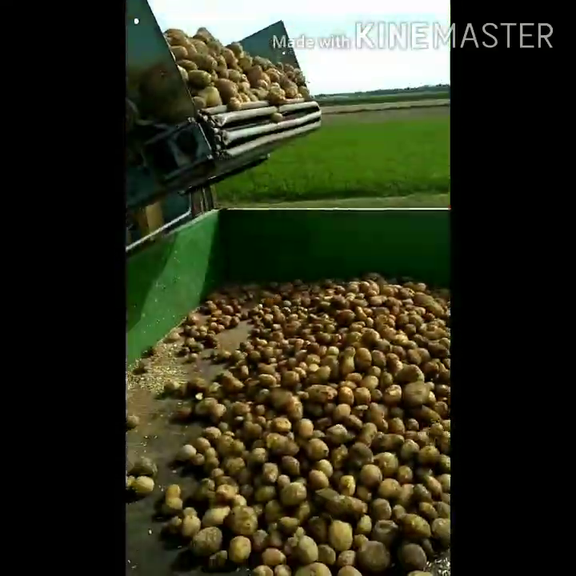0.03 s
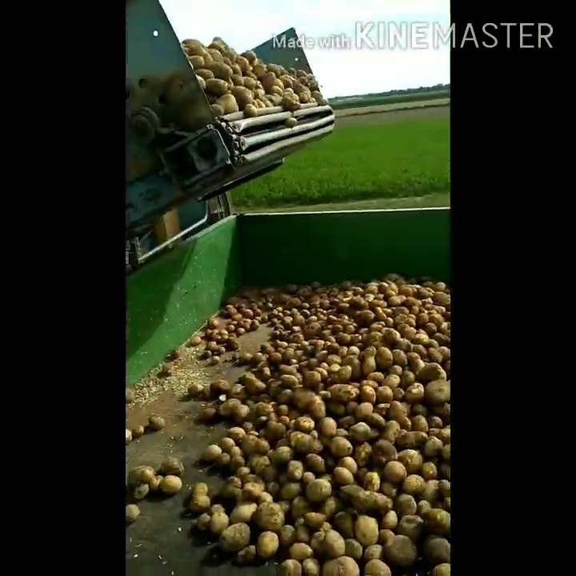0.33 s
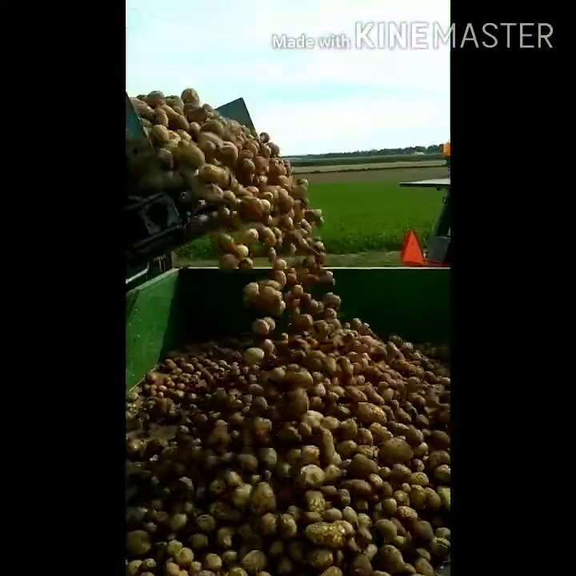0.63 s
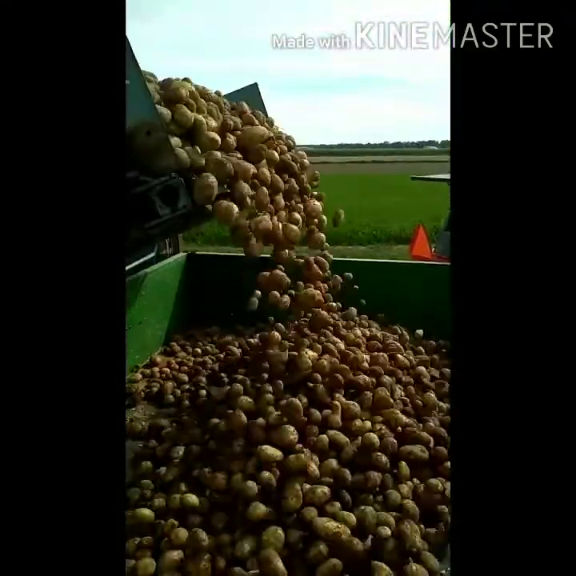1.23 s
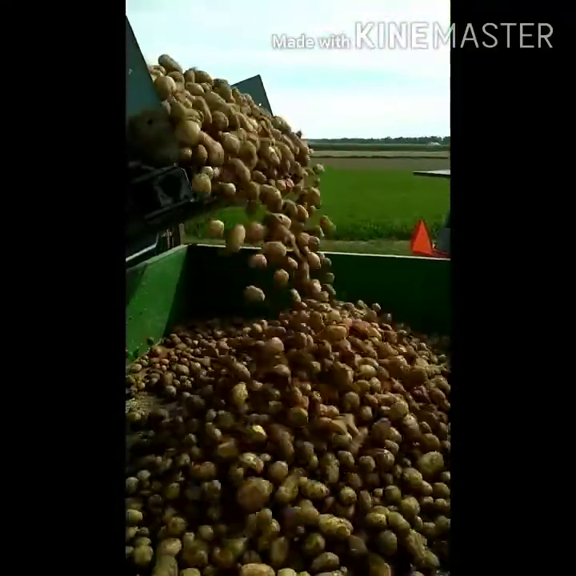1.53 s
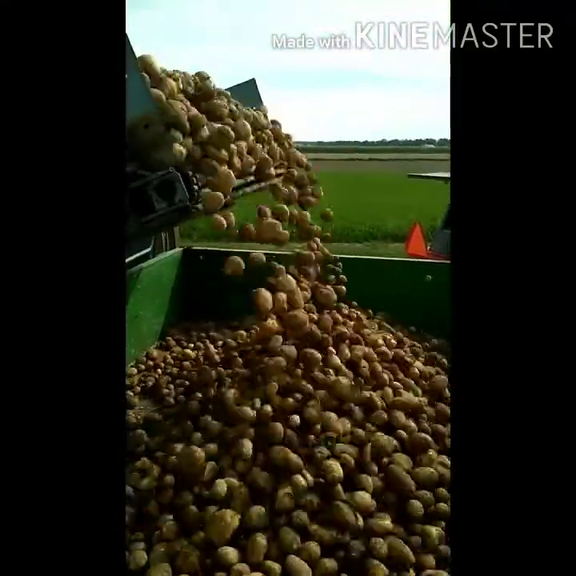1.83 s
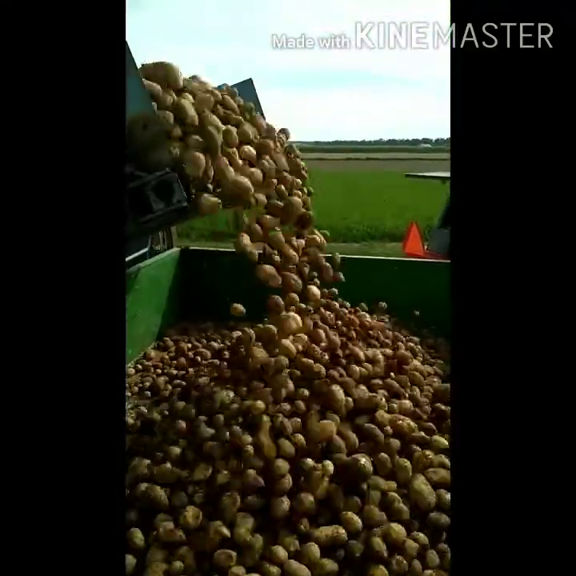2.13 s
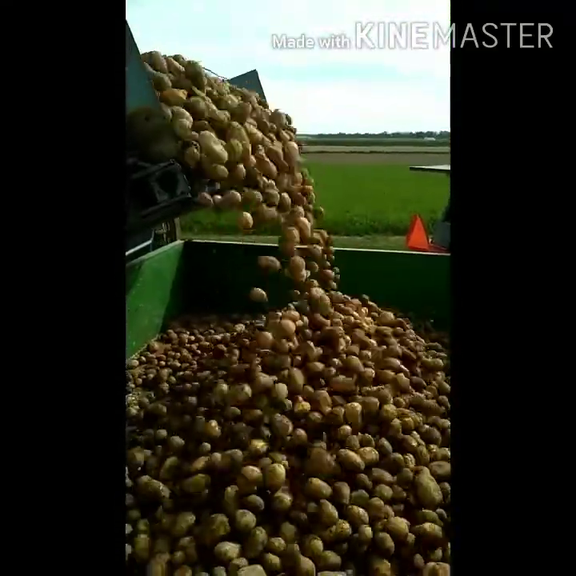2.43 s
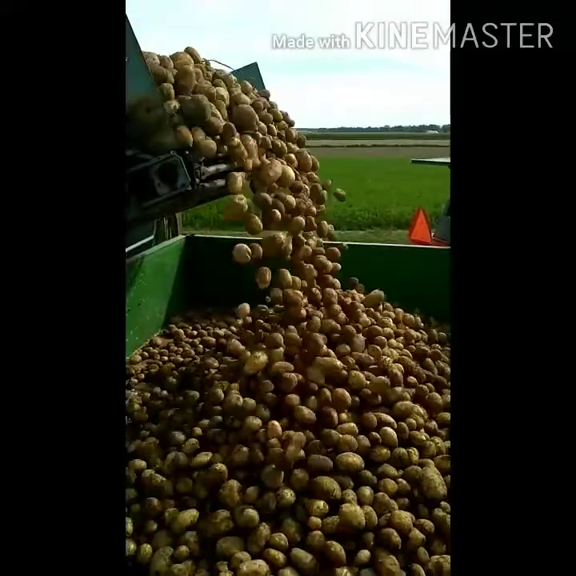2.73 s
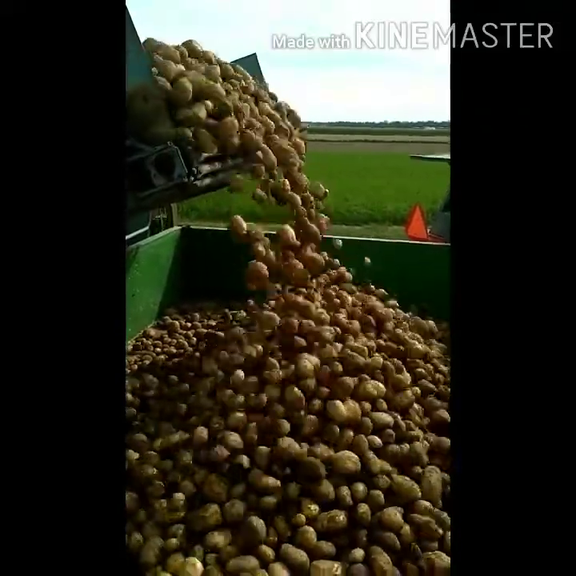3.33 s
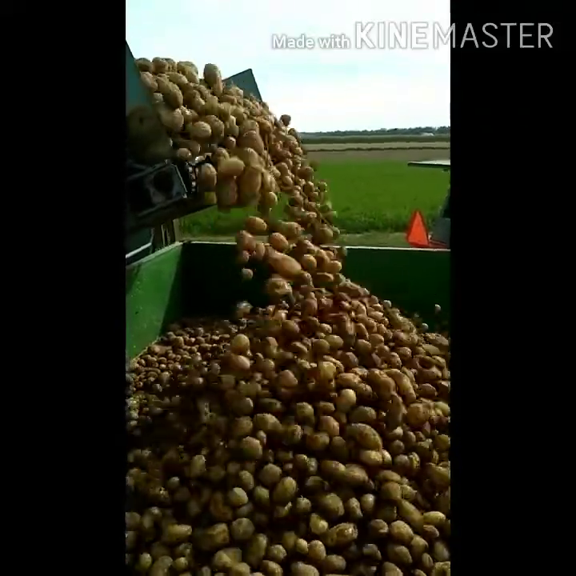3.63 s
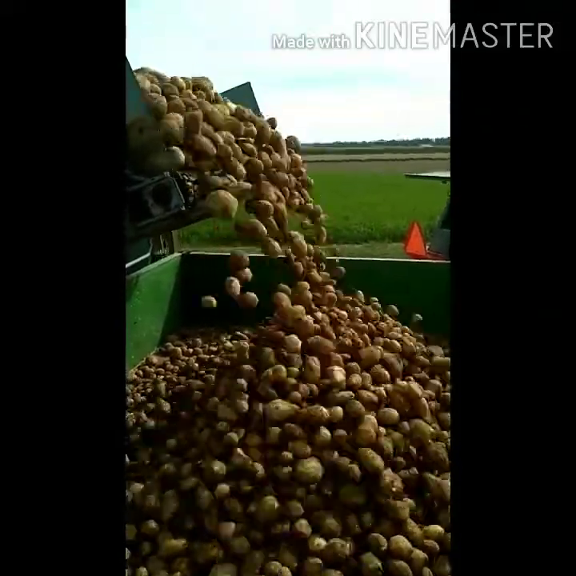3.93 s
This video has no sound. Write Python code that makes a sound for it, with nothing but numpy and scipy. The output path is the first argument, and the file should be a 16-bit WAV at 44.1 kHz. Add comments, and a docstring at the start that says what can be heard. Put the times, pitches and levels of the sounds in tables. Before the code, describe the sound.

Potatoes tumble onto a heap in a metal trailer while a harvester rumbles and its chain clinks.

```python
"""A harvester's rod conveyor pours potatoes into a steel trailer, over its engine's rumble.
0-0.48 s: quieter opening; exhaust puffs, chain rattle, light thuds. Then silence until 0.6 s.
From 0.63 s the load falls: potatoes thud on the heap, knock together and crack on the rods.
The trailer floor booms; chain links clink on the sprocket about nine times a second.
From 1.15 s some potatoes hit bare steel, and the wall bangs and rings."""
import sys
import numpy as np
from scipy import signal
from scipy.fft import rfft, irfft, next_fast_len
from scipy.io import wavfile
from scipy.ndimage import uniform_filter1d, minimum_filter1d

SR = 44100
rng = np.random.default_rng(int(sys.argv[2]) if len(sys.argv) > 2 else 0)


def wrap_up_sound(samples):
    """Save the sound to the file named by the first command line argument, as 16-bit audio."""
    columns = np.atleast_2d(samples).T
    # keep every value between -1 and 1, then stretch to whole-number steps
    tamed = np.clip(columns, -1, 1)
    steps = np.round(tamed * 32767).astype(np.int16)
    wavfile.write(sys.argv[1], SR, steps)


N = 176400

# potato flow before and during the pour: t/s, thud level/dB, knock level/dB
OPENING_FLOW = [(0.0, -27, -33), (0.068, -18.5, -27.5), (0.358, -24, -35), (0.47, -25, -36)]
POUR_FLOW = [(0.63, -13, -30), (0.73, -9.5, -30.5), (1.14, -12.5, -30), (1.15, -8.5, -20.5),
             (1.32, -8.5, -27.5), (1.86, -8.5, -27), (2.05, -9.5, -24.5), (2.19, -10, -29),
             (2.39, -7.5, -21.5), (2.56, -8, -25.5), (2.6, -9.5, -24.5), (2.86, -14, -30.5),
             (3.01, -11, -23.5), (3.17, -10.5, -32.5), (3.2, -6, -23), (3.52, -9.5, -28.5),
             (3.56, -7, -26.5), (3.72, -12, -26.5), (3.78, -6.5, -25), (3.85, -11, -31), (4.0, -6, -23.5)]
# machine: t/s, engine level/dB, rattle level/dB
MACHINE_LEVELS = [(0, -22.5, -36), (.47, -32, -37.5), (.62, -24, -38.5), (.8, -22, -31), (1.7, -17.5, -31),
                  (2.2, -22, -31.5), (2.8, -18, -32.5), (4, -22.5, -30)]
# spectral shapes: f/Hz, relative density/dB
ENGINE_SPECTRUM = [(15, -34), (28, -21), (38, -13.5), (52, -7.5), (75, -6.5), (110, -5), (180, -11),
                   (400, -30), (1500, -35), (8000, -72.5)]
RATTLE_SPECTRUM = [(500, -7.5), (2000, -5), (4000, -12), (6000, -11), (7800, -8), (10000, 0.5), (11500, 1),
                   (13500, -6.5), (15700, -5)]
CLINK_SPECTRUM = [(500, -15), (2000, 0), (4000, -4.5), (6500, -1), (8000, 0), (10000, 8.5), (11200, 2),
                  (12500, -7), (15700, -22)]
BANG_SPECTRUM = [(60, -16), (200, 8.5), (400, -0.5), (540, 5), (680, -1.5), (830, -3.5), (1100, -17),
                 (1500, -23), (2500, -38), (5000, -35), (12000, -67)]
CLATTER_SPECTRUM = [(300, -6), (800, 0), (1450, 0), (2200, -4), (4000, -8), (8000, -16), (15000, -28)]
KNOCK_SPECTRUM = [(150, -20.5), (400, 2.5), (520, -2), (600, -1.5), (760, -2), (1000, -13), (1500, -16),
                  (2200, -23.5), (3500, -26), (7000, -31), (14000, -80.5)]
THUD_SPECTRUM = [(40, -40.5), (100, -14), (125, -7), (150, -1), (178, 1.5), (203, 0.5), (225, 2.5),
                 (255, -3), (310, -4), (400, -11.5), (600, -26), (1500, -48), (5000, -90.5)]
# modes of the chain rods and the steel wall: f/Hz, level/dB, t60/s
ROD_MODES = [(2273, -10, .25), (8032, -7, .4), (10858, -2, .22), (13243, -11, .3)]
WALL_MODES = [(431, 0, 1.0), (460, -3, .9), (520, -5, .4), (691, -9, .6), (813, -10, .4), (1082, -13, .4),
              (1465, -19, .5)]
# grit on chain, links on sprocket, potatoes on steel: t/s, level/dB
GRIT_HITS = [(.694, -28), (.795, -31), (2.789, -22), (3.478, -21)]
LINK_HITS = [(0.0472, -26.5), (0.2963, -33.5), (0.4666, -28), (0.738, -29), (0.8521, -29), (0.9593, -28),
             (1.07, -30.5), (1.21, -35), (1.319, -34), (1.438, -29), (1.652, -25), (1.6794, -29),
             (1.797, -30), (1.9067, -31), (2.01, -25), (2.119, -31), (2.2268, -26.5), (2.381, -31),
             (2.4425, -35), (2.551, -28.5), (2.6612, -33), (2.764, -28), (2.7936, -37), (2.8698, -27),
             (2.984, -25.5), (3.095, -26), (3.1932, -24), (3.4477, -30.5), (3.5616, -32), (3.693, -30),
             (3.803, -30)]
WALL_HITS = [(1.152, -11.5), (1.18, -14.5), (1.262, -19), (1.591, -22.5), (1.683, -18.5), (2.045, -16.5),
             (2.076, -22), (2.607, -22.5), (3.56, -17.5), (3.759, -26.5), (3.92, -17.5)]
# conveyor squeaks: t/s, length/s, f/Hz, glide/(Hz/s), level/dB, overtone step/dB
CONVEYOR_SQUEAKS = [(.29, .15, 3830, 900, -43.5, -5), (.425, .05, 2400, 3500, -43, -15),
                    (.63, .11, 2230, -1100, -39.5, -18), (.765, .07, 2270, 900, -38, -18),
                    (1.16, .07, 2270, 600, -37, -18), (1.3, .06, 2300, -500, -40, -18),
                    (2.035, .03, 2270, 0, -35, -18), (2.085, .08, 2290, 0, -33.5, -18)]
# floor booms: t/s, length/s, f/Hz, level/dB
FLOOR_BOOMS = [(0.641, 0.25, 231.3, -14.5), (0.801, 0.065, 83.6, -16.5), (1.16, 0.07, 514, -18),
               (1.261, 0.12, 292.8, -18), (1.561, 0.083, 72, -13.5), (1.753, 0.11, 225.2, -6),
               (2.36, 0.16, 178.6, -5), (2.468, 0.15, 234.4, -3.5), (3.22, 0.1, 223.3, -12.5),
               (3.62, 0.15, 175.4, -7.5), (3.881, 0.33, 222.4, -9)]
# potatoes and clods on rods and frame: t/s, level/dB, spot f/Hz
FRAME_HITS = [(.051, -28, 1300), (.055, -22, 780), (.128, -33, 1250), (.466, -32, 1300), (.955, -36, 2300),
              (1.15, -14.5, 900), (1.268, -26, 850), (1.581, -29, 1250), (1.651, -25, 1400),
              (1.664, -22, 850), (1.681, -24, 1150), (1.691, -28.5, 1900), (2.045, -20, 750),
              (2.381, -30, 1500), (2.655, -23, 800), (2.68, -22, 1330), (2.98, -32, 2000)]
# heavy potatoes on the heap: t/s, level/dB, f/Hz
HEAP_HITS = [(0.053, -6.5, 198), (0.659, 0, 216.3), (0.853, -6, 231), (1.146, -12, 199),
             (1.275, 5.5, 293.4), (1.54, 5.5, 232.5), (1.617, -7.5, 162), (1.73, -1.5, 176),
             (1.958, 5, 163), (2.042, 2.5, 165.6), (2.268, 2.5, 215), (2.717, 5, 216.4), (2.977, -5, 236),
             (3.377, 3, 170.4), (3.571, 0, 170), (3.786, -6, 168), (3.915, 2.5, 233)]
# stereo likeness: f/Hz, left-right correlation
CORRELATION = [(60, .992), (130, .975), (290, .925), (640, .7), (1400, .2), (3000, 0), (15000, 0)]
# microphone balance: f/Hz, left minus right/dB
MIC_BALANCE = [(100, -1.5), (280, 1.3), (500, 0.5), (5000, -0.5), (11000, -1), (13000, 4), (15000, 2.5)]

TIME_S, HIT_TIME_S = np.arange(N) / SR, np.arange(SR // 2) / SR


def amp(db):
    """dB to gain."""
    return 10 ** (np.asarray(db) / 20)


def unit(x):
    """Scale to unit rms."""
    return x / np.sqrt(np.mean(x ** 2) + 1e-20)


def wander(shape, width):
    """Unit-rms noise, smoothed over width points."""
    return unit(uniform_filter1d(rng.standard_normal(shape), size=width))


def read(points, hz):
    """Interpolate a table over log frequency."""
    points_hz, value = np.transpose(points)
    return np.interp(np.log(hz + 1), np.log(points_hz + 1), value)


def level(rows, column):
    """dB column of a time table to gain per sample."""
    rows = np.array(rows)
    return amp(np.interp(TIME_S, rows[:, 0], rows[:, column]))


def add(mix, start_s, sound):
    """Mix a sound in at start_s."""
    part = mix[:, max(round(start_s * SR), 0):][:, :sound.shape[-1]]
    part += sound[..., :part.shape[1]]


def colour(x, spectrum):
    """Minimum-phase filter of unit energy; channels alike in the bass, unrelated in the treble."""
    size = next_fast_len(N + 8192)
    bins = size // 2 + 1
    hz = abs(np.fft.fftfreq(size, 1 / SR))
    log_gain = np.log(unit(amp(read(spectrum, hz))))
    mid, side = rfft(x, size) * np.exp(np.conj(signal.hilbert(log_gain)))[:bins]
    correlation = np.clip(read(CORRELATION, hz[:bins]), -1, 1)
    mid *= np.sqrt((1 + correlation) / 2)
    side *= np.sqrt((1 - correlation) / 2)
    return irfft(np.array([mid + side, mid - side]), size)[:, :N]


def burst(t60_s, rise_s, hold_s=0):
    """One impact as noise: rise, optional hold, decay."""
    attack = np.minimum(HIT_TIME_S / rise_s, 1)
    decay = amp(-60 * np.maximum(HIT_TIME_S - hold_s, 0) / t60_s)
    return rng.standard_normal((2, len(HIT_TIME_S))) * attack * decay


def ring(modes, scatter_db):
    """Damped modes, with new levels and phases at each blow."""
    out = np.zeros((2, len(HIT_TIME_S)))
    for hz, db, t60_s in modes:
        gain = amp(db + scatter_db * rng.standard_normal((2, 1)))
        phase = 2 * np.pi * (hz * HIT_TIME_S + rng.random((2, 1)))
        out += gain * amp(-60 * HIT_TIME_S / t60_s) * np.cos(phase)
    end_fade = np.minimum(10 * (1 - HIT_TIME_S / HIT_TIME_S[-1]), 1)
    return out * end_fade


def patter(rate_hz, spread_db, t60_s, rise_s, spots, uneven_db=0):
    """Random impacts of random size, shared among spots that each have their own response."""
    out = np.zeros((2, N))
    for _ in range(spots):
        struck = rng.random(N) < rate_hz / spots / SR
        hits = struck * amp(spread_db * np.minimum(rng.exponential(1, N), 3))
        spectrum = rfft(burst(t60_s, rise_s))
        spectrum *= amp(uneven_db * wander(spectrum.shape[1], width=300))
        response = irfft(spectrum)[:, :SR // 4]
        out += signal.oaconvolve(hits[None], response, axes=1)[:, :N]
    return unit(out)


def engine(firing_hz=37.8, hum_ratio=0.58, throb_depth=0.17, gain_db=-1):
    """Exhaust puffs at the firing rate, plus a hum at twice that rate."""
    phase = 2 * np.pi * firing_hz * TIME_S
    puffs = rng.standard_normal((2, N)) * (1 + throb_depth * np.cos(phase))
    rumble = unit(colour(puffs, ENGINE_SPECTRUM))
    hum = hum_ratio * np.sin(2 * phase)
    return amp(gain_db) * level(MACHINE_LEVELS, column=1) * unit(rumble + hum)


def conveyor_squeaks(roughness=0.016):
    """Metal rubs on metal: rough, gliding tones of three harmonics."""
    out = np.zeros((2, N))
    for start_s, length_s, hz, glide_hz_per_s, db, step_db in CONVEYOR_SQUEAKS:
        t = np.arange(0, length_s, 1 / SR)
        jitter = wander((2, SR), width=60)[:, :len(t)]
        pitch_hz = (hz + glide_hz_per_s * t) * (1 + roughness * jitter)
        phase = 2 * np.pi * np.cumsum(pitch_hz, axis=1) / SR
        tone = sum(amp(step_db * k) * np.sin((k + 1) * phase) for k in range(3))
        add(out, start_s, amp(db) * np.sin(np.pi * t / length_s) ** 0.5 * tone)
    return out


def chain_grit(highpass_hz=11000):
    """Grit clicks on the chain."""
    clicks = np.zeros((2, N))
    for start_s, db in GRIT_HITS:
        add(clicks, start_s, amp(db) * burst(t60_s=0.097, rise_s=0.003))
    return signal.lfilter(*signal.butter(2, highpass_hz, "highpass", fs=SR), clicks)


def chain_rattle(gain_db=-1):
    """Dense, tiny impacts of the running chain."""
    ticks = patter(rate_hz=900, spread_db=3.3, t60_s=0.05, rise_s=0.00024, spots=28, uneven_db=3.2)
    return amp(gain_db) * colour(ticks * level(MACHINE_LEVELS, column=2), RATTLE_SPECTRUM)


def chain_clinks(clink_db=-1, shake_db=-6, rod_db=-17):
    """Links strike the sprocket; the rods shake and ring."""
    clinks, rods = np.zeros((2, 2, N))
    for start_s, db in LINK_HITS:
        strike = burst(t60_s=0.024, rise_s=0.003, hold_s=0.008)
        shake = amp(shake_db) * burst(t60_s=0.2, rise_s=0.014)
        add(clinks, start_s, amp(db + clink_db) * (strike + shake))
        add(rods, start_s, amp(db + rod_db) * ring(ROD_MODES, scatter_db=3))
    return colour(clinks, CLINK_SPECTRUM) + rods


def trailer_wall(ring_db=-8.5, crossfeed=0.4):
    """Potatoes hit bare steel: a bang, then the wall's modes."""
    bangs, rings = np.zeros((2, 2, N))
    for start_s, db in WALL_HITS:
        add(bangs, start_s, amp(db) * burst(t60_s=0.37, rise_s=0.00032))
        wall = ring(WALL_MODES, scatter_db=5)
        add(rings, start_s, amp(db + ring_db) * (wall + crossfeed * wall[::-1]))
    return colour(bangs, BANG_SPECTRUM) + rings


def trailer_floor(waver=0.028):
    """The loaded floor booms: wavering resonances swell and fade."""
    out = np.zeros((2, N))
    for start_s, length_s, hz, db in FLOOR_BOOMS:
        drift = wander(SR, width=300)[:int(length_s * SR)]
        phase = 2 * np.pi * np.cumsum(hz * (1 + waver * drift)) / SR
        add(out, start_s, amp(db) * np.hanning(len(drift)) ** 0.5 * np.sin(phase))
    return out


def potato_clatter(spot_q=4, broadband_db=-15):
    """Potatoes and clods crack on rods and frame; each struck spot has a broad resonance."""
    cracks = np.zeros((2, N))
    for start_s, db, hz in FRAME_HITS:
        hit = burst(t60_s=0.14, rise_s=0.00037, hold_s=0.006)
        resonance = signal.lfilter(*signal.iirpeak(hz, spot_q, SR), hit)
        add(cracks, start_s, amp(db) * (amp(broadband_db) * hit + resonance))
    return colour(cracks, CLATTER_SPECTRUM)


def potato_knocks(flow):
    """Potatoes knock lightly against one another."""
    knocks = patter(rate_hz=520, spread_db=-0.5, t60_s=0.05, rise_s=0.00049, spots=10)
    return colour(knocks * level(flow, column=2), KNOCK_SPECTRUM)


def potato_thuds(flow, stream_db=-3, thump_db=-10, hollow_db=-3, hollow_t60_s=0.15, hollow_rise_s=0.004):
    """The stream thuds into the heap; heavy potatoes add a thump and a hollow tone."""
    thuds = patter(rate_hz=260, spread_db=1.5, t60_s=0.13, rise_s=0.0012, spots=10)
    thuds *= amp(stream_db) * level(flow, column=1)
    hollow = np.zeros((2, N))
    envelope = (1 - np.exp(-HIT_TIME_S / hollow_rise_s)) * amp(-60 * HIT_TIME_S / hollow_t60_s)
    for start_s, db, hz in HEAP_HITS:
        add(thuds, start_s, amp(db + thump_db) * burst(t60_s=0.11, rise_s=0.002))
        add(hollow, start_s, amp(db + hollow_db) * envelope * np.sin(2 * np.pi * hz * HIT_TIME_S))
    return colour(thuds, THUD_SPECTRUM) + hollow


def scene():
    """All sources, heard at the trailer's edge."""
    flow = list(OPENING_FLOW) + list(POUR_FLOW)
    rumble = engine()
    potatoes = potato_thuds(flow) + potato_knocks(flow) + potato_clatter()
    trailer = trailer_wall() + trailer_floor()
    conveyor = chain_grit() + chain_clinks() + conveyor_squeaks() + chain_rattle()
    return rumble + potatoes + trailer + conveyor


def pause(from_s=0.476, to_s=0.6048, fall_s=0.0069, rise_s=0.022, floor_db=-61):
    """Gain curve of the short silence before the pour."""
    fade_out = np.clip(1 - (TIME_S - from_s) / fall_s, 0, 1)
    fade_in = np.clip((TIME_S - to_s) / rise_s, 0, 1)
    return np.maximum(fade_out + fade_in, amp(floor_db))


def record(dry, left_lead_s=0.00012, ceiling_db=-1, cutoff_hz=15650):
    """Microphone balance and spacing, peak limiter, pause, low-pass."""
    hz = np.fft.rfftfreq(2 * N, 1 / SR)
    left = amp(read(MIC_BALANCE, hz) / 2) * np.exp(1j * np.pi * hz * left_lead_s)
    mics = irfft(rfft(dry, 2 * N) * np.array([left, 1 / left]))[:, :N]
    peak_gain = np.minimum(amp(ceiling_db) / (abs(mics).max(0) + 1e-9), 1)
    limited = mics * uniform_filter1d(minimum_filter1d(peak_gain, size=500), size=400)
    lowpass = signal.firwin(511, cutoff_hz, window=("kaiser", 9), fs=SR)
    return signal.oaconvolve(limited * pause(), lowpass[None], "same", axes=1)


dry = scene()
out = record(dry)
wrap_up_sound(out)
```